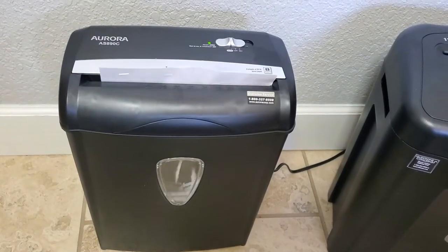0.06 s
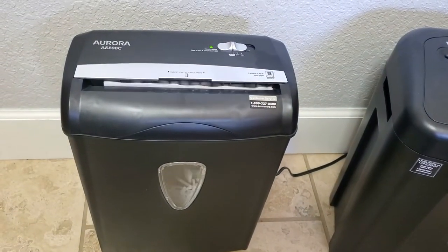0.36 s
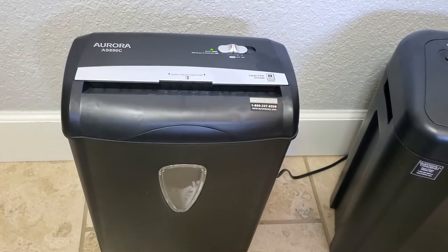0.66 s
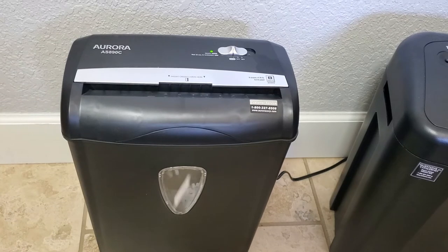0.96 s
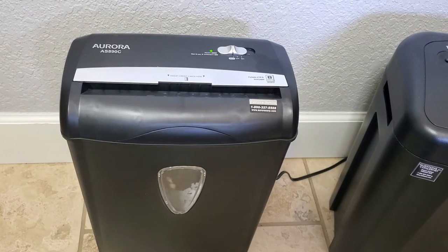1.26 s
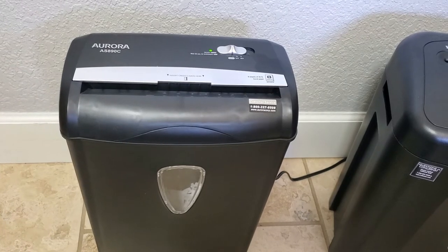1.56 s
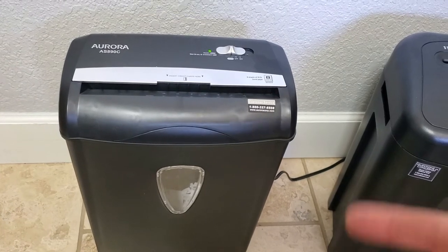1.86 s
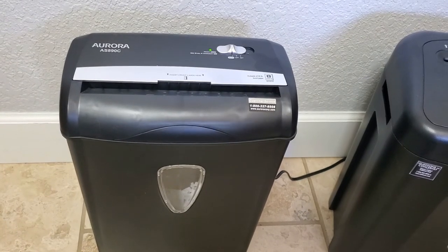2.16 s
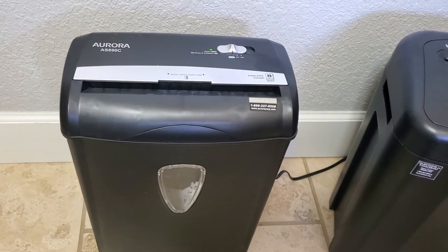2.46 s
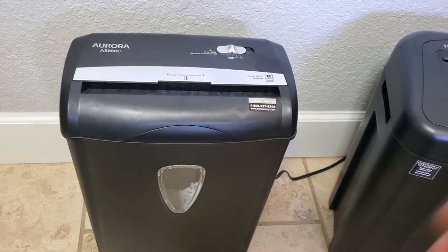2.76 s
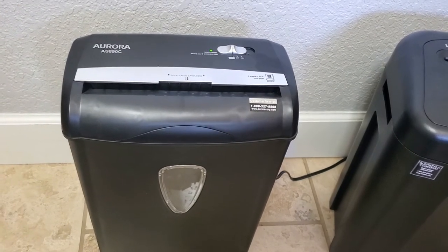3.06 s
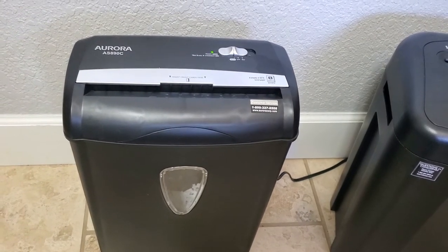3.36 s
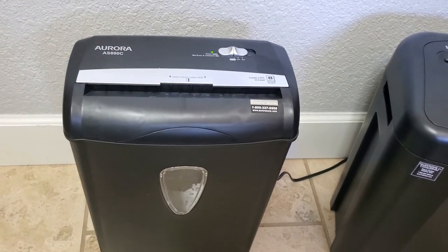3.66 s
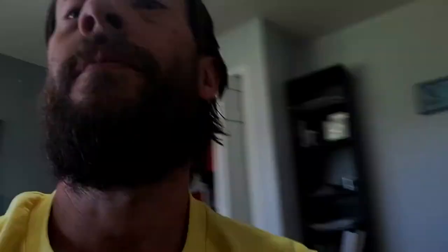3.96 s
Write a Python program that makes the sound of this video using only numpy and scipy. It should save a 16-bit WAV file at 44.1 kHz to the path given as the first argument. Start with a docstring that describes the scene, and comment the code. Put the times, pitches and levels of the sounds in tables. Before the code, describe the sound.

Paper shredder grinding and crackling, running empty, then coasting to a stop before faint handling clicks.

```python
"""A paper shredder chews the end of a sheet, speeds up as it runs empty, then switches off and coasts to rest.
Its gears whine and rattle in a plastic casing, throbbing with the cutters, and groan as they slow.
Paper crackles in the cutters and flaps into the bin.
In the quiet room that is left, a hand rubs and clicks against the microphone."""
import sys
import numpy as np
from scipy import signal
from scipy.fft import rfft, irfft, next_fast_len
from scipy.io import wavfile
from scipy.ndimage import map_coordinates

SR = 44100
rng = np.random.default_rng(int(sys.argv[2]) if len(sys.argv) > 2 else 0)


def output_pcm(signal):
    """Save a mono or channel-first signal as 16-bit PCM at the path in sys.argv[1].

    Samples are clipped to [-1, 1] before scaling.
    """
    pcm = np.clip(np.atleast_2d(signal).T, -1, 1) * 32767
    wavfile.write(sys.argv[1], SR, np.round(pcm).astype(np.int16))


N = 176400
TIME = np.arange(N) / SR
FFT_SIZE = next_fast_len(N + SR // 2, True)
HZ = np.fft.rfftfreq(FFT_SIZE, 1 / SR)
FREE_SHAFT_HZ, TURNS_PER_BITE, POWER_OFF_S = 277, 11.25, 2.02


# gear and motor tones (order [x shaft speed], loaded [dB], empty [dB], throb [dB])
GEAR_TONES = [(0.9995, -35.5, -45.5, 5), (2.125, -38.5, -58, 1.5), (4.013, -35.5, -49, 7),
              (7.994, -39.5, -42.5, 3), (10, -56.5, -51.5, 1.5), (11.855, -44.5, -68.5, 3),
              (12.01, -55, -46, 3.5), (12.94, -63.5, -54, 3), (14.6, -47.5, -63, 0.5),
              (15.91, -55, -50.5, 2), (19.04, -61, -54, 4), (19.97, -40.5, -47.5, 2.5), (23, -68.5, -55, 4),
              (23.97, -65.5, -54.5, 3.5), (31.7, -66, -60.5, 3.5), (50.04, -77.5, -55, 1),
              (60.1, -61.5, -56.5, 2)]
# panel resonances (centre [Hz], width [Hz], lift [dB])
PANEL_MODES = [(2140, 85, 8.5), (2936, 68, 9.5), (4444, 130, 5), (13600, 900, 5.5)]
def whine(speed, turns, load):
    """Gear tones throb with the cutters, echo in the bin, ring the panels and die once power is cut."""
    full_sag, lag_bites, fade_s, bin_decay_s = .18, .55, .1, .012
    strain = (TIME < POWER_OFF_S) * np.clip((1 - speed) / full_sag, 0, 1) ** 3
    fade = np.exp(-np.maximum(TIME - POWER_OFF_S, 0) / fade_s)
    tones = np.zeros((2, N))
    for order, loaded_db, empty_db, throb_db in GEAR_TONES:
        throb = amp(throb_db * np.cos(2 * np.pi * (turns / TURNS_PER_BITE - lag_bites / order)))
        flutter = 1 + .38 * np.array([drift(24), drift(35)]) + .19 * drift(140)
        level = load * amp(loaded_db) + (1 - load) * amp(empty_db)
        jitter_rad = .2 + .026 * order + .7 * strain
        phase = 2 * np.pi * (order * turns + rng.random()) + jitter_rad * drift(60)
        tones += level * throb * fade * flutter * np.sqrt(2) * np.sin([phase, phase - .7])
    t = TIME[:SR // 10]
    bin_response = unit(rng.standard_normal((2, len(t))) * np.exp(-t / bin_decay_s)) / np.sqrt(len(t))
    echo = band(signal.oaconvolve(tones, bin_response, axes=1)[:, :N], 2820, 4200)
    balance_db = np.outer([.5, -.5], spectrum(BALANCE))
    return colour(tones + echo, amp(resonance_db(PANEL_MODES) + balance_db))


def scrape(speed, turns):
    """Gear roughness: part random, part repeating with each cutter turn."""
    period = round(SR * TURNS_PER_BITE / FREE_SHAFT_HZ)
    position = (turns / TURNS_PER_BITE % 1) * period
    profiles = rng.standard_normal((2, period))
    worn = np.array([map_coordinates(row, [position], order=3, mode='grid-wrap') for row in profiles])
    repeat = .33 * np.minimum(speed, 1)
    return np.sqrt(repeat * speed) * worn + np.sqrt(1 - repeat) * rng.standard_normal((2, N))


# gear rattle (frequency [Hz], relative density [dB])
RATTLE_SPECTRUM = [(25, -39.5), (50, -29.5), (80, -6.5), (140, -11), (190, -4), (350, -6), (500, -11.5),
                   (650, -4.5), (830, -6.5), (1350, -12.5), (2000, -8), (2650, -7), (3400, -10),
                   (5000, -13), (5900, -18), (7200, -15), (10000, -20.5), (16000, -28)]
# casing resonances and dips (centre [Hz], width [Hz], lift [dB])
CASING_MODES = [(200, 13, 3), (256, 28, 11), (296, 18, -7.5), (314.7, 12, 8.5), (441.8, 29.4, 16),
                (498, 26, -3), (542, 92, 6), (634, 43, 7.5), (721, 70, 7), (830, 50, -8), (876, 100, 4.5),
                (1044, 175, 6.5), (1683, 150, 5), (2250, 590, 4.5), (2697, 150, -4), (3000, 100, 6),
                (3850, 180, 5.5), (4940, 180, 10.5), (6580, 200, 8), (7050, 200, 6)]
def rattle(speed, turns, bite, load):
    """Gear teeth scrape in pulses and ring the casing; the treble dies first as they slow."""
    mesh = np.exp(.14 * np.cos(2 * np.pi * turns) + .11 * drift(100)) * amp(2 * load)
    casing_db = spectrum(RATTLE_SPECTRUM) + resonance_db(CASING_MODES)
    noise = unit(stereo(mesh * scrape(speed, turns), casing_db))
    lowpass = 1 / (1 + (HZ / 1100) ** 4)
    highpass = 1 - 1 / (1 + (HZ / 6000) ** 4)
    low = colour(noise, lowpass) * speed ** .56 * np.minimum(speed / .13, 1)
    mid = colour(noise, 1 - lowpass - highpass) * speed ** 1.09
    high = colour(noise, highpass) * speed ** 1.4
    low_throb_db = .36 * bite + 1.3 * drift(26)
    upper_throb_db = (.67 + 1.5 * (TIME > POWER_OFF_S)) * bite + .91 * drift(47)
    return amp(-27) * (low * amp(low_throb_db) + (mid + high) * amp(upper_throb_db))


# coasting gear tones (order [x shaft speed], level [dB], speed exponent)
COAST_TONES = [(7.9, -1, .05), (12, -3, .8), (20, -4, 1.2)]
# surges of the gear groan as the cutters keep turning and slow (start [s], length [s], level [dB])
COAST_SURGES = [(2.041, .045, -36), (2.096, 0.053, -31.5), (2.148, 0.058, -34.5), (2.229, 0.057, -31),
                (2.333, .06, -27.5), (2.398, .045, -41)]
def groan(speed, turns):
    """Coasting gears sound rough falling tones in surges; the upper ones die first."""
    width_hz = 74
    tones = np.zeros((2, N))
    for order, db, exponent in COAST_TONES:
        roughness = np.array([drift(width_hz) + 1j * drift(width_hz) for _ in range(2)]) + 1.36
        tones += amp(db) * speed ** exponent * unit((roughness * np.exp(2j * np.pi * order * turns)).real)
    surges = sum(amp(db) * swell(start_s, length_s) for start_s, length_s, db in COAST_SURGES)
    return stereo(tones * surges)


# paper cutting (time [s], level [dB])
CRACKLE_LEVEL = [(0, -24), (.12, -30), (.18, -24.5), (.34, -23.5), (.44, -28), (.56, -31), (.66, -30.5),
                 (.76, -29.5), (.84, -35), (1.0, -35.5), (1.15, -62), (1.5, -110)]
# tearing paper (frequency [Hz], relative density [dB])
CRACKLE_SPECTRUM = [(100, -31.5), (300, 2), (650, 0.5), (1300, -9), (2400, -13.5), (3300, -1), (4100, 1),
                    (5200, -6), (6000, -7), (9000, -10), (16000, -9.5)]
def crackle(bite):
    """Countless small tears in the paper, slightly louder at each bite of the cutters."""
    tears_per_s, grain_s = 1500, .00049
    tears = (rng.random(N) < tears_per_s / SR) * amp(3.4 * np.minimum(rng.exponential(1, N), 5))
    grains = np.sqrt(signal.lfilter([1], [1, -np.exp(-1 / (SR * grain_s))], tears ** 2))
    noise = unit(stereo(grains * rng.standard_normal((2, N)), spectrum(CRACKLE_SPECTRUM)))
    return noise * amp(curve(CRACKLE_LEVEL) + .3 * bite)


# loud paper snaps (time [s], level [dB], ring [Hz], decay [s])
PAPER_SNAPS = [(.139, -20, 5000, 0.0034), (0.144, -10.5, 5230, 0.0027), (0.1774, -12, 3500, 0.0018),
               (0.2072, -17.5, 3680, 0.0037), (0.2387, -17, 3900, .002), (.3175, -16, 5000, 0.0027),
               (0.327, -16.5, 3790, 0.0035), (0.3427, -18, 4300, 0.0034), (.3622, -8.5, 3850, .0035),
               (0.3986, -15, 2000, 0.0025), (.4022, -22.5, 5200, .003), (0.5146, -13.5, 3960, 0.0064),
               (0.5918, -22, 3900, 0.0017)]
def snaps():
    """Paper snaps: a crack, then a brief blurred ring and hiss."""
    out, t = np.zeros((2, N)), TIME[:SR // 20]
    crack = 4.5 * band(1. * (t == 0), 2000, 11000, order=1)
    for start_s, db, ring_hz, decay_s in PAPER_SNAPS:
        noise = rng.standard_normal((2, len(t)))
        blur_cycles = .04 * np.cumsum(noise, axis=1)
        ring = .75 * np.sin(2 * np.pi * (ring_hz * t + blur_cycles + rng.random((2, 1))))
        hiss = .48 * unit(band(noise, 1600, 15000, order=1))
        add(out, start_s, amp(db) * ((ring + hiss) * np.exp(-t / decay_s) + crack))
    return stereo(out)


# shreds hitting the bin (start [s], length [s], level [dB], centre [Hz])
SHRED_FLAPS = [(0.48, 0.058, -22.5, 327), (0.536, 0.053, -26.5, 243), (0.633, 0.097, -27, 234),
               (0.726, 0.079, -26, 254), (1.32, 0.33, -37, 93.4), (1.7, .1, -37, 230)]
def flaps():
    """The tail of the sheet and loose shreds drum dully on the bin."""
    out = np.zeros((2, N))
    for start_s, length_s, db, hz in SHRED_FLAPS:
        noise = unit(band(rng.standard_normal((2, N)), hz * .49, hz * 1.81, order=3))
        out += amp(db) * swell(start_s, length_s) * noise
    return stereo(out)


# skin rubs (start [s], length [s], left [dB], right [dB])
HAND_RUBS = [(3.258, 0.052, -68, -53), (3.305, 0.074, -64, -47.5), (3.406, 0.065, -83, -60.5),
             (3.524, 0.13, -65, -60), (3.601, 0.051, -53.5, -49), (3.632, 0.093, -51.5, -47),
             (3.694, .15, -45, -46), (3.798, 0.12, -37, -45), (3.854, 0.15, -50.5, -51)]
# rubbing skin, per channel (frequency [Hz], relative density [dB])
RUB_SPECTRUM_LEFT = [(30, 4), (80, 12.5), (200, -0.5), (500, -2), (1500, -10), (3800, -5), (5200, -10),
                     (7000, -23), (12000, -20), (16000, -21)]
RUB_SPECTRUM_RIGHT = [(30, -2), (80, 13), (200, -0.5), (500, -9), (1500, -7.5), (3800, -9), (5200, -12),
                      (6500, -6), (8500, -18), (12500, -9.5), (16000, -20)]
# grip bumps (time [s], left [dB], right [dB], pitch [Hz], decay [s])
GRIP_BUMPS = [(3.479, -52, -30, 91, 0.013), (3.537, -50, -40, 72, .015), (3.859, -33, -36, 120, 0.0078),
              (3.8572, -8.5, -23, 470, 0.0018)]
# finger clicks (time [s], left gain [dB], right gain [dB], low edge [Hz], high edge [Hz])
FINGER_CLICKS = [(3.479, -28, -5, 70, 600), (3.5383, -42, -19, 70, 900), (3.544, -42, -29, 100, 2000),
                 (3.824, 15, -16, 1350, 3920), (3.8499, 13, -17, 1190, 4530), (3.8567, 13.5, -4, 288, 3050),
                 (3.8901, 5, -8, 2650, 6960)]
def hand():
    """Skin rubs over the microphone housing, bumps it and ticks dryly at its ports."""
    level = sum(amp([[left_db], [right_db]]) * swell(start_s, length_s)
                for start_s, length_s, left_db, right_db in HAND_RUBS)
    rub_gain = amp([spectrum(RUB_SPECTRUM_LEFT), spectrum(RUB_SPECTRUM_RIGHT)])
    out = level * unit(colour(rng.standard_normal((2, N)), rub_gain)) * amp(1.4 * drift(119))
    t = TIME[:SR // 10]
    for start_s, left_db, right_db, hz, decay_s in GRIP_BUMPS:
        bump = np.sin(2 * np.pi * hz * t) * np.exp(-t / decay_s)
        add(out, start_s, amp([[left_db], [right_db]]) * bump)
    for start_s, left_db, right_db, low_hz, high_hz in FINGER_CLICKS:
        tick = (t == 0) + .0034 * rng.standard_normal(len(t)) * np.exp(-t / .011)
        click = band(tick, low_hz, high_hz) + .11 * band(tick, 140, 16000, order=1)
        add(out, start_s, amp([[left_db], [right_db]]) * click)
    return out


def skin_slide():
    """Dry skin hisses past the right microphone port."""
    hiss = unit(band(rng.standard_normal(N), 11000, 16500))
    return np.array([[.15], [1]]) * amp(-48) * swell(start_s=3.645, length_s=.06) * hiss


# faint rustle, ticks, hiss and ring (start [s], length [s], level [dB], low edge [Hz], high edge [Hz])
FAINT_NOISES = [(1.5, 0.006, -53, 2000, 6500), (2.735, 0.16, -58.5, 1230, 5700),
                (2.29, 0.9, -68.5, 10200, 14600), (2.44, 0.7, -75.5, 2450, 2600),
                (2.742, 0.0054, -56, 2000, 6500)]
def faint_noises():
    """A faint rustle and ticks, a thin high hiss and a faint lingering ring."""
    out = np.zeros((2, N))
    for start_s, length_s, db, low_hz, high_hz in FAINT_NOISES:
        noise = unit(band(rng.standard_normal((2, N)), low_hz, high_hz))
        out += amp(db) * swell(start_s, length_s) * noise
    return stereo(out)


# room air (frequency [Hz], relative density [dB])
ROOM_SPECTRUM = [(25, -18), (55, -2.5), (85, -12.5), (120, -7.5), (170, -20.5), (270, -20.5), (500, -33.5),
                 (1500, -35), (4000, -33), (9000, -43.5), (13000, -41), (16000, -45)]
def room():
    """Faint air and a low wavering hum."""
    hum_hz = 59 + .7 * drift(5)
    hum = np.sqrt(2) * np.sin(2 * np.pi * np.cumsum(hum_hz) / SR) * amp(-60.5 + 2 * drift(6))
    air = unit(stereo(rng.standard_normal((2, N)), spectrum(ROOM_SPECTRUM)))
    return hum + amp(-62.5) * air


# channel likeness (frequency [Hz], correlation before clipping)
LIKENESS = [(50, 0.5), (130, 1.1), (270, 1.15), (600, .5), (1300, 0.16), (2500, -0.05), (6000, -0.1),
            (15000, 0)]
# channel balance (frequency [Hz], left minus right [dB])
BALANCE = [(60, 1), (110, -0.5), (200, 2.5), (380, -1.5), (700, 1.5), (1290, 4.0), (2380, 4.0), (4400, 5.5),
           (8120, 0), (15000, -2)]
def stereo(pair, db=0):
    """Colours two unrelated signals and blends them as mid and side."""
    correlation = np.clip(spectrum(LIKENESS), -.98, .98)
    mid, side = rfft(pair, FFT_SIZE) * np.sqrt([1 + correlation, 1 - correlation])
    lean = amp(spectrum(BALANCE) / 2)
    channels = np.array([(mid + side) * lean, (mid - side) / lean])
    return irfft(channels * amp(db) / np.sqrt(2), FFT_SIZE)[:, :N]


def amp(db):
    """Decibels to gain."""
    return 10 ** (np.asarray(db) / 20)


def unit(x):
    """Scales to rms 1."""
    return x / np.sqrt(np.mean(x ** 2) + 1e-20)


def curve(points):
    """Breakpoints to a value per sample."""
    return np.interp(TIME, *np.transpose(points))


def spectrum(points):
    """Breakpoints to a value per bin, along log frequency."""
    hz, value = np.transpose(points)
    return np.interp(np.log(HZ + 1), np.log(hz + 1), value)


def resonance_db(modes):
    """Summed peaks and dips per bin."""
    return sum(db / (1 + (2 * (HZ - hz) / width_hz) ** 2) for hz, width_hz, db in modes)


def colour(x, gain):
    """Filters by a gain per bin."""
    return irfft(rfft(x, FFT_SIZE) * gain, FFT_SIZE)[..., :N]


def band(x, low_hz, high_hz, order=2):
    """Causal band-pass."""
    top_hz = min(max(high_hz, low_hz + 10), SR / 2 - 10)
    sos = signal.butter(order, [min(low_hz, top_hz - 1), top_hz], 'band', fs=SR, output='sos')
    return signal.sosfilt(sos, x)


def drift(rate_hz):
    """Slow random wandering, rms 1."""
    return unit(colour(rng.standard_normal(N), np.exp(-(HZ / rate_hz) ** 2)))


def swell(start_s, length_s):
    """Half-sine envelope."""
    return np.sin(np.pi * np.clip((TIME - start_s) / length_s, 0, 1))


def add(mix, start_s, sound):
    """Mixes a sound in place."""
    part = mix[:, max(round(start_s * SR), 0):][:, :sound.shape[-1]]
    part += sound[..., :part.shape[1]]


# motor shaft (time [s], speed [Hz])
SHAFT_SPEED = [(0, 247.5), (.44, 247), (.54, 240), (.62, 227), (.8, 227), (.9, 241), (1.0, 258),
               (1.07, 263.5), (1.29, 269), (1.55, 272), (1.93, 278.3), (2.02, 276), (2.1, 222), (2.25, 131),
               (2.36, 80), (2.44, 41), (2.52, 14), (2.64, 1)]
# paper in the cutters (time [s], load [0-1])
PAPER_LOAD = [(0, 0.99), (.5, 0.89), (.8, 0.61), (.98, 0.17), (1.1, 0.07)]
def scene():
    """One motor drives gears and cutters; room and hand sound independently."""
    shaft_hz = curve(SHAFT_SPEED) * (TIME < SHAFT_SPEED[-1][0])
    speed, load = shaft_hz / FREE_SHAFT_HZ, curve(PAPER_LOAD)
    wobble = 1 + .0031 * load * drift(25) + .0006 * drift(20)
    turns = np.cumsum(shaft_hz * wobble) / SR
    cutter_rad = 2 * np.pi * turns / TURNS_PER_BITE
    bite = np.cos(cutter_rad) + .32 * np.cos(2 * cutter_rad)
    gears = whine(speed, turns, load) + rattle(speed, turns, bite, load) + groan(speed, turns)
    paper = crackle(bite) + snaps() + flaps()
    return gears + paper + faint_noises() + skin_slide() + room() + hand()


def record(dry):
    """Full-scale clip, then low-pass."""
    lowpass = signal.firwin(401, 16150, window=('kaiser', 9), fs=SR)
    return signal.oaconvolve(np.clip(dry, -1, 1), lowpass[None], 'same')


dry = scene()
out = record(dry)
output_pcm(out)
```